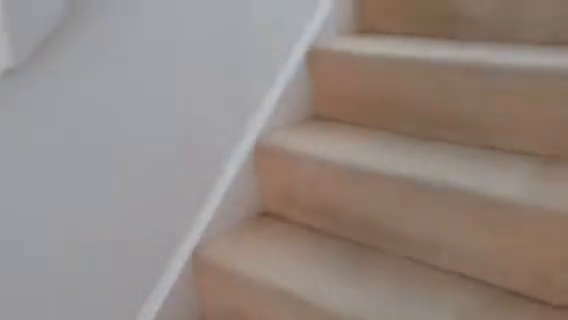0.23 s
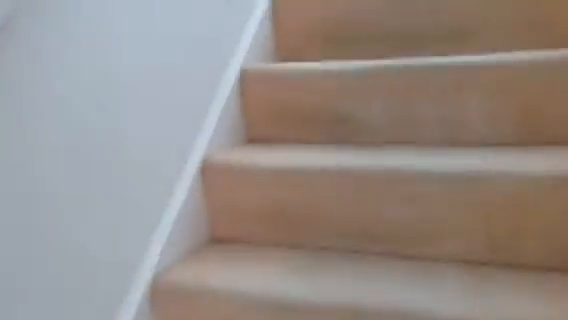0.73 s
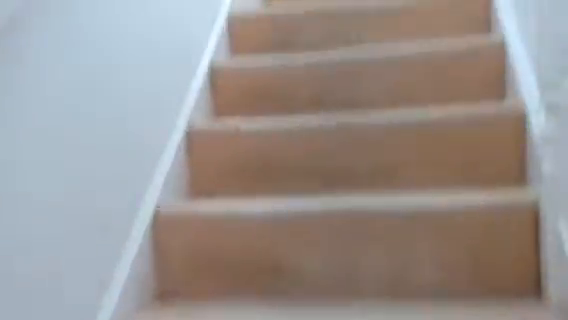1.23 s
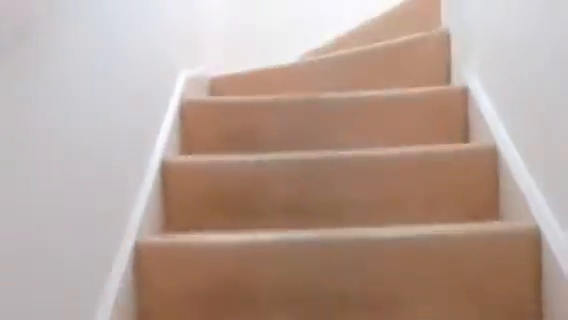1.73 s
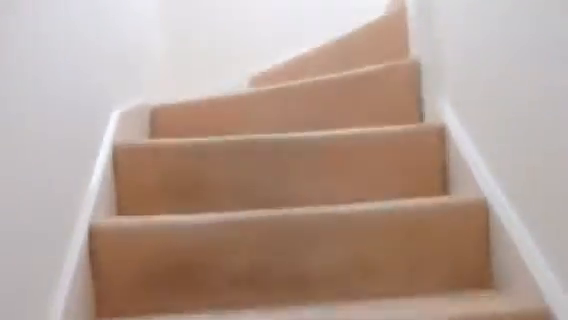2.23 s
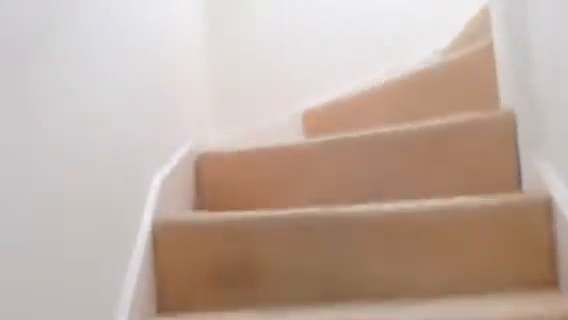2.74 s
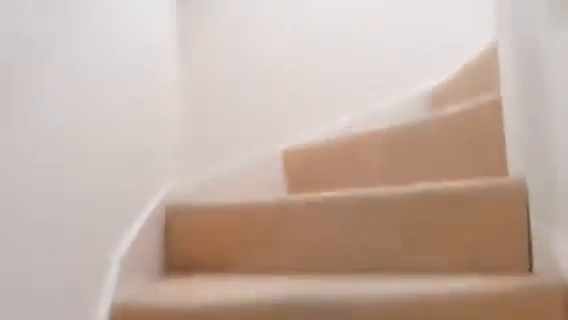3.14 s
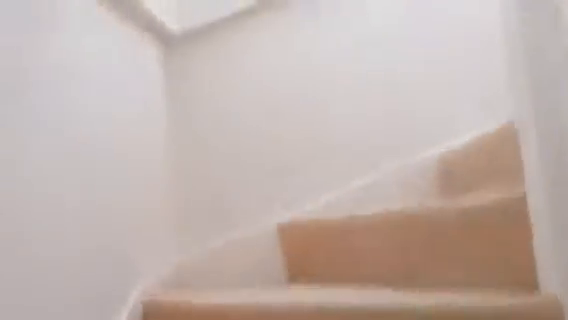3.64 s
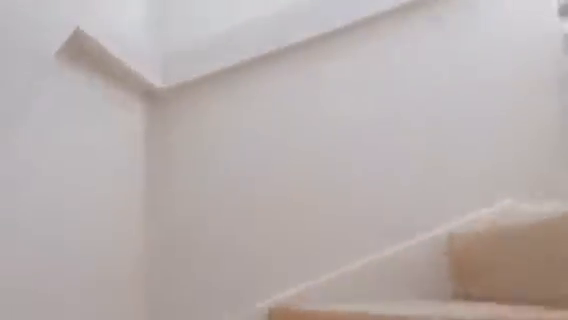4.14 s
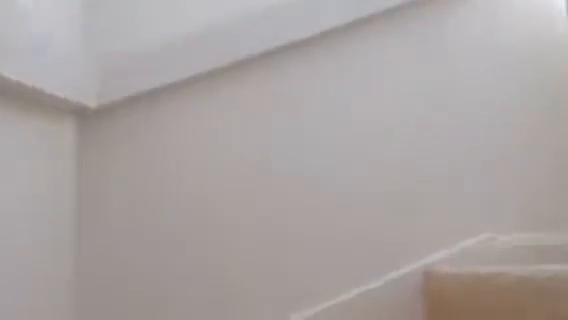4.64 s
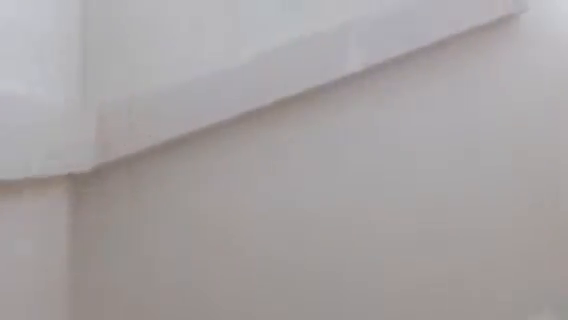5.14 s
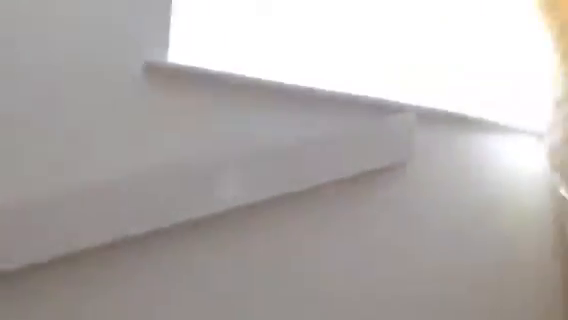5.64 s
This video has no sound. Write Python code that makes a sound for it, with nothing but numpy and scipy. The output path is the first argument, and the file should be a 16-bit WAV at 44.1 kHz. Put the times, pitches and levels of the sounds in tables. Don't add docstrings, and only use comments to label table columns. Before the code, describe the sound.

Quiet indoor climb heard from about a body length above the feet: microphone hiss, soft carpet steps and low timber mutter. A hard, sudden wooden knock breaks in early, with a deep shudder of the stairs, followed by a cluster of creaky cracks and dull thuds. Later steps are nearer and uneven, with toe taps, scuffs and brief rubbing drags. Bare walls give short echoes.

```python
import sys
import numpy as np
from scipy import signal
from scipy.fft import rfft, irfft
from scipy.io import wavfile
from scipy.ndimage import uniform_filter1d

SR = 44100
rng = np.random.default_rng(int(sys.argv[2]) if len(sys.argv) > 2 else 0)


def linear_from_db(decibels):
    return 10 ** (np.asarray(decibels, float) / 20)


def int16_out(signal):
    q = np.round(np.clip(np.atleast_2d(signal).T, -1, 1) * 32767)
    wavfile.write(sys.argv[1], SR, q.astype(np.int16))


N = 259308

# (frequency [Hz], level [dB], t60 [s])
TREAD = [(104, -32, 0.18), (136, -31, 0.078), (183, -0.5, 0.16), (222, -5, 0.32), (258, -5, 0.31),
         (287.5, 2, 0.17), (371.3, 1.5, 0.084), (429.7, -7, 0.35), (482, -1.5, 0.041), (655, -19.5, 0.3),
         (840, -13, 0.22), (924, -22, 0.093)]


def rms_one(x):
    return x / np.sqrt(np.mean(x ** 2) + 1e-20)


def at_hz(points, hz):
    points = np.array(points)
    return np.interp(np.log(hz + 1), np.log(points[:, 0]), points[:, 1])


def ring(force, hz, t60):
    radius = linear_from_db(-60 / (max(t60, 0.0005) * SR))
    turn = 2 * np.pi * hz / SR
    return signal.lfilter([0, np.sin(turn)], [1, -2 * radius * np.cos(turn), radius * radius], force + 1e-18)


def coloured(x, spectrum):
    gain = linear_from_db(at_hz(spectrum, np.fft.rfftfreq(N, 1 / SR)))
    return rms_one(irfft(rfft(x) * gain, N))


def grains(per_s, spread_db):
    sizes = linear_from_db(spread_db * np.minimum(rng.exponential(1, N), 4)) * rng.choice([-1, 1], N)
    return sizes * (rng.random(N) < per_s / SR)


def add(out, s, sound):
    at = round(s * SR)
    out[at:at + len(sound)] += sound[:N - at]


def swells(column, rise_db_per_s, fall_db_per_s, rest_db):
    # (time [s], deep shudder [dB], tread mutter [dB], sole and cloth rustle [dB])
    landings = [(.05, -90, -69, -66.5), (.66, -92, -59.5, -67.5), (.84, -92, -70, -62.5),
                (1.1, -92, -63.5, -66), (1.44, -69, -64, -66.5), (1.6, -81, -59, -61.5),
                (1.76, -92, -63.5, -62.5), (1.96, -74, -63.5, -66.5), (2.29, -33, -49, -56),
                (2.52, -54.5, -71, -65.5), (2.76, -50.5, -58.5, -77), (2.91, -75, -53, -57.5),
                (3.15, -87, -69, -66), (3.41, -56, -52.5, -60.5), (3.55, -82, -62, -66.5),
                (3.68, -55, -68, -84), (3.98, -48, -56.5, -66), (4.11, -74, -57, -61),
                (4.29, -55, -63, -67), (4.44, -85, -64.5, -73), (4.57, -55, -69, -72),
                (4.77, -74, -64, -81), (4.99, -63, -59, -65.5), (5.2, -59, -55.5, -62.5),
                (5.31, -67, -67, -62), (5.5, -78, -75, -71), (5.8, -72, -68, -78)]
    t, power = np.arange(0, N + 64, 64) / SR, linear_from_db(2 * rest_db)
    for row in landings:
        late = t - row[0]
        level_db = row[column] + np.minimum(rise_db_per_s * late, -fall_db_per_s * late)
        power = power + linear_from_db(2 * level_db)
    return np.interp(np.arange(N) / SR, t, 10 * np.log10(power))


def hiss():
    # (frequency [Hz], density [dB per Hz])
    hiss_spectrum = [(15, -52), (25, -26), (43, -37), (59, -24), (215, -4), (322, -2), (523, -7.5),
                     (666, -3.5), (1140, -8.5), (1240, -6.5), (5880, -11.5), (13900, -13), (15500, -9.5)]
    # (time [s], swell [dB])
    swings = [(.02, 0.5), (.72, 2), (1.25, 3.5), (1.6, 0.5), (2.03, 5.5), (2.35, 3), (2.65, 5), (3.2, 3.5),
              (3.78, 3.5), (4.42, 4), (5.05, 4), (5.3, 0.5), (5.58, 5), (5.85, 2.5)]
    t, swing_s, rest_db = np.arange(N) / SR, 0.15, -65
    swell_db = sum(db * np.exp(-((t - s) / swing_s) ** 2) for s, db in swings)
    return linear_from_db(rest_db + swell_db) * coloured(rng.standard_normal(N), hiss_spectrum)


def shudder():
    level_db = swells(1, rise_db_per_s=448, fall_db_per_s=127, rest_db=-97)
    deep = ring(ring(rng.standard_normal(N), 95.0, 0.071), 125.0, 0.35)
    return linear_from_db(level_db - 14) * rms_one(deep)


def rustle():
    # (frequency [Hz], density [dB per Hz])
    rustle_spectrum = [(240, -10.5), (400, -2.5), (727, -3), (1150, -5), (1250, -5), (1360, -8.5),
                       (1710, -9), (3430, -15.5), (12000, -28), (15600, -29), (22000, -120)]
    level_db = swells(3, rise_db_per_s=82, fall_db_per_s=52, rest_db=-73)
    return linear_from_db(level_db - 2.0) * coloured(grains(2500.0, spread_db=2.0), rustle_spectrum)


def mutter():
    level_db = swells(2, rise_db_per_s=120, fall_db_per_s=48, rest_db=-75)
    modes = sum(linear_from_db(db) * ring(grains(150.0, spread_db=5.0), hz, 0.5 * t60) for hz, db, t60 in TREAD)
    modes = signal.sosfilt(signal.butter(4, 125, "high", fs=SR, output="sos"), modes)
    return linear_from_db(level_db - 3.5) * rms_one(modes)


def stairwell(x):
    # (frequency [Hz], t60 [s])
    well_t60 = [(80, 0.52), (300, 0.39), (1500, 0.28), (5000, 0.09), (14000, 0.17)]
    t, noise, echo = np.arange(SR // 2) / SR, rng.standard_normal(SR // 2), 0
    for hz in 62.5 * 2 ** np.arange(8):
        band = signal.sosfilt(signal.butter(2, [hz, hz * 2], "band", fs=SR, output="sos"), noise)
        echo = echo + band * linear_from_db(-60 * t / at_hz(well_t60, hz * np.sqrt(2)))
    answer = rfft(echo * np.minimum(t / 0.013, 1))
    answer = answer / np.sqrt(uniform_filter1d(np.abs(answer) ** 2, size=25))
    return signal.fftconvolve(x, irfft(answer))[:N]


def squeaks():
    # (start [s], end [s], frequency [Hz], width [Hz], level [dB])
    rubs = [(.05, .15, 900, 1200, -64.5), (.16, .2, 660, 120, -65), (1.43, 1.74, 2300, 270, -71),
            (1.675, 1.71, 950, 500, -63), (2.88, 2.955, 440, 30, -51), (4.06, 4.17, 900, 1200, -64),
            (4.69, 4.745, 560, 150, -60), (4.88, 4.98, 1950, 210, -62), (.63, .675, 4200, 1400, -61.5),
            (1.54, 1.6, 2280, 200, -67), (2.59, 2.725, 4970, 100, -74.5), (4.684, 4.74, 2750, 150, -56),
            (4.71, 4.84, 1380, 80, -65), (4.684, 4.78, 4400, 1500, -55), (4.872, 4.98, 4000, 1800, -59)]
    out = np.zeros(N)
    for start, end, hz, width_hz, level_db in rubs:
        tone = rms_one(ring(rng.standard_normal(SR // 2), hz, 2.2 / width_hz))
        progress = np.clip(np.arange(SR // 2) / SR / (end - start), 0, 1)
        add(out, start, linear_from_db(level_db) * tone * np.sin(np.pi * progress) ** 0.5)
    return out


def cracks(table, tail_t60, dulling_db=6.5):
    # (frequency [Hz], level [dB])
    pile_modes = [(480, 6.5), (640, 3.5), (850, -22), (1100, -3), (1400, 2), (1800, 2.5), (2250, 1.5),
                  (2800, 4.5), (3500, 5.5), (4300, 4.5), (5300, -12), (6500, 1)]
    out, t = np.zeros(N), np.arange(SR // 2) / SR
    noise = rng.standard_normal((len(table), 3, len(t)))
    luck = rng.standard_normal((len(table), len(pile_modes), 2))
    edge = signal.butter(2, 5500, "high", fs=SR, output="sos")
    for (s, peak_db, hz, tilt_db, tail_db), (low, high, slips), chance in zip(table, noise, luck):
        body = signal.butter(2, [hz / 2.5, hz * 2.47], "band", fs=SR, output="sos")
        high = linear_from_db(tilt_db) * rms_one(signal.sosfilt(edge, high))
        crack = (rms_one(signal.sosfilt(body, low)) + high) * linear_from_db(-60 * t / 0.018)
        clumps = uniform_filter1d(uniform_filter1d(slips, size=200), size=200)
        clumps = rms_one(clumps)
        pile = 0
        for k, ((mode_hz, mode_db), (detune, gain)) in enumerate(zip(pile_modes, chance)):
            mode_hz = mode_hz * (1 + 0.029 * detune)
            fading_db = -dulling_db * np.log2(mode_hz / 500) * t / tail_t60
            patch_db = 1.0 * gain + 1.4 * np.roll(clumps, 1500 * k)
            tone = rms_one(ring(low[::-1], mode_hz, 8.4 / mode_hz))
            pile = pile + linear_from_db(mode_db + patch_db + fading_db) * tone
        pile = pile / np.sqrt(np.mean(pile[:2000] ** 2))
        scuff = pile + high * linear_from_db(-40 * t / tail_t60 - 2.0)
        scuff = linear_from_db(tail_db - 60 * (t / tail_t60) ** 1.22) * scuff
        onset = np.minimum(t / 0.00064, 1)
        add(out, s, linear_from_db(peak_db - 4) * (crack + scuff) * onset)
    return out


def joints_and_soles():
    # (time [s], peak [dB], centre [Hz], treble tilt [dB], scuff tail [dB])
    joints = [(1.549, -52, 816, -15, -9), (2.241, -31.5, 1490, -5, -14), (2.323, -46, 1790, -9, -25),
              (2.35, -36.5, 703, -4.5, -5.5), (2.418, -36.5, 1080, -5, -12), (2.515, -47, 750, -18, -16),
              (2.722, -31, 2200, -4, -17.5), (2.772, -39, 2000, -2.5, -5.5), (2.807, -39, 1200, -12, -6.5),
              (2.849, -41.5, 1170, -20, -9.5), (3.65, -33, 2560, -19, -17.5), (4.065, -53, 754, -19, -9),
              (4.271, -47.5, 802, -5, -12.5), (4.605, -50.5, 1160, -34, -6.5), (5.184, -51, 1190, -23, -17),
              (5.228, -51, 1500, -25, -11), (5.795, -39.5, 3600, -19, -9), (5.824, -47.5, 886, -6, -19)]
    slaps = [
        (0.626, -50.5, 700, -18, -8),
        (2.219, -55, 600, -36, -19),
        (3.408, -56, 1980, -9, -0.5),
        (3.958, -53.5, 726, -9, 0.5),
        (4.005, -52.5, 974, -6, -1.5),
        (5.287, -47, 1980, -9, -2.5),
        (5.493, -46.5, 1420, -3, -2.5),
        (5.771, -58, 1340, -8, -2),
    ]
    drags = [
        (0.8, -60, 1200, -14, 3.5),
        (1.67, -62, 900, -18, 1.5),
        (4.684, -45.5, 2650, -15, 4),
        (4.872, -43.5, 1950, -8, -3.5),
    ]
    return cracks(joints, 0.28) + cracks(slaps, 0.27) + cracks(drags, 0.42, dulling_db=6.0)


def loose_board():
    # (time [s], peak [dB], centre [Hz], treble tilt [dB], scuff tail [dB])
    knock = [
        (2.2756, -17, 2870, -3, -21),
        (2.28, -16, 1650, -4.5, -12),
    ]
    # (frequency [Hz], peak [dB], t60 [s])
    board_modes = [(100, -36, .2), (141, -28, .16), (190, -31, .14), (240, -25, .24), (295, -33, .12),
                   (340, -28, .17), (378, -33, .12), (500, -42, .08), (630, -33, .1), (712, -32, .12),
                   (775, -33, .12), (1000, -34, .1), (1265, -35, .1), (1620, -35, .1), (1850, -29, .09),
                   (2060, -30, .09)]
    strike = np.zeros(N)
    add(strike, knock[1][0], -np.ones(1))
    board = sum(linear_from_db(db) * ring(strike, hz, t60) for hz, db, t60 in board_modes)
    return cracks(knock, 0.21, dulling_db=5.0) + linear_from_db(1) * board


def thuds(table, t60, contact):
    out, chance = np.zeros(N), rng.standard_normal((len(table), 2, len(TREAD)))
    noise = rng.standard_normal((len(table), 2000))
    t, long_t = np.arange(2000) / SR, np.arange(SR // 2) / SR
    for (s, peak_db, hz, others_db), luck, rough in zip(table, chance, noise):
        push = np.zeros(SR // 2)
        push[:2000] = t * np.exp(-t / max(contact, 0.001))
        own = ring(push * np.sin(2 * np.pi * hz * long_t), hz, t60)
        push[:2000] *= rough
        others = 0
        for (mode_hz, mode_db, mode_t60), gain, detune in zip(TREAD, *luck):
            others = others + linear_from_db(mode_db + 1.6 * gain) * ring(push, mode_hz * (1 + 0.079 * detune), mode_t60)
        sound = own / np.abs(own).max() + linear_from_db(others_db) * others / np.abs(others).max()
        add(out, s - 1.178 * contact, linear_from_db(peak_db - 7.5) * sound)
    return out


def footfalls():
    # (time [s], peak [dB], tread pitch [Hz], neighbouring timber [dB])
    flight = [(0.089, -53.5, 341, -1), (0.19, -63, 540, -8), (0.624, -50.5, 258, 4.5),
              (0.896, -57.5, 360, 5), (1.205, -57.5, 287, -16), (1.413, -55, 166, -3),
              (1.57, -48.5, 225, -17), (2.097, -59, 190, 1), (2.726, -45.5, 244, -6), (2.772, -49, 294, 9),
              (2.79, -36.5, 258, 2), (2.825, -43, 285, 7), (2.889, -50, 407, -8), (2.939, -44, 398, 0),
              (2.989, -46, 323, -10), (3.119, -52.5, 416, 9), (3.149, -43.5, 204, -1), (3.198, -49, 330, 9),
              (3.355, -45.5, 296, 6), (3.372, -45, 236, 8), (3.389, -49.5, 200, 6.5), (3.652, -46, 209, 7)]
    winders = [(3.878, -45.5, 244, 1), (3.908, -44, 274, 1), (3.959, -51, 213, 10), (4.079, -46, 299, 7),
               (4.606, -39.5, 223, -7), (4.64, -44.5, 217, -12), (4.737, -41.5, 238, 6),
               (4.874, -43, 181, 2.5), (4.909, -41.5, 156, 6), (4.95, -44.5, 175, 8.5),
               (4.989, -42, 204, -21), (5.029, -46, 193, -2), (5.187, -35, 186, -4.5), (5.24, -53, 215, 6),
               (5.461, -51.5, 191, 10.5), (5.492, -40, 203, 0), (5.711, -50, 209, -2),
               (5.77, -49.5, 181, 12.5), (5.792, -39.5, 201, 2.5), (5.822, -45, 187, 6.5)]
    stumble = [
        (2.2205, -25.5, 476, 2),
        (4.568, -40.5, 230, -7),
    ]
    taps = [
        (2.243, -21, 217, -2.5),
        (3.538, -39, 348, -2),
        (4.062, -42.5, 349, 7.5),
        (4.273, -45.5, 147, 2),
        (4.69, -42, 280, 1),
        (5.289, -39.5, 177, -2),
        (5.551, -42.5, 182, -7),
    ]
    steps = thuds(flight, t60=0.082, contact=0.00463) + thuds(winders, t60=0.064, contact=0.00437)
    toes = thuds(stumble, t60=0.021, contact=0.00176) + thuds(taps, t60=0.045, contact=0.00296)
    return steps + toes


def scene():
    hits = squeaks() + joints_and_soles() + loose_board() + footfalls()
    near = hiss() + rustle() + mutter() + hits + linear_from_db(-9.5) * stairwell(hits)
    near = signal.sosfilt(signal.butter(4, 100, "high", fs=SR, output="sos"), near)
    return (near + shudder())[None]


def band_limit(x):
    return signal.sosfilt(signal.butter(12, 15850, fs=SR, output="sos"), x)


def record(dry):
    mix = signal.sosfilt(signal.cheby2(12, 60, 16050, fs=SR, output="sos"), dry)
    return band_limit(mix)


dry = scene()
out = record(dry)
int16_out(out)
```